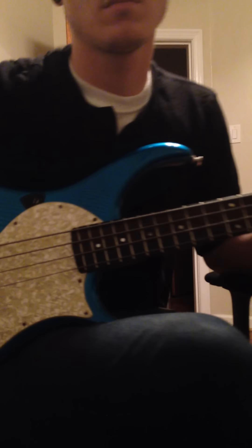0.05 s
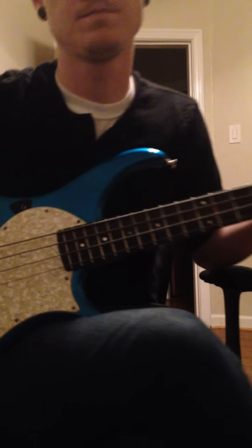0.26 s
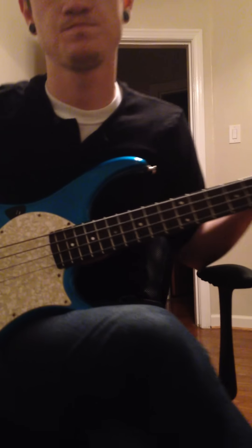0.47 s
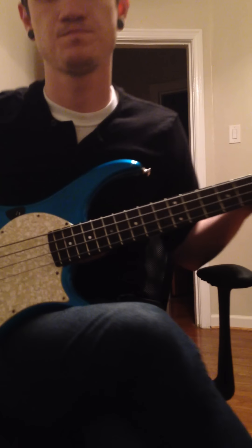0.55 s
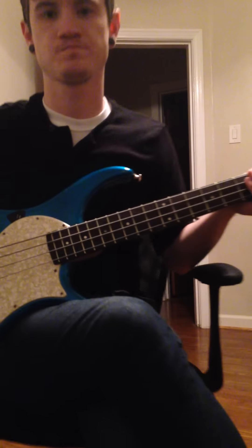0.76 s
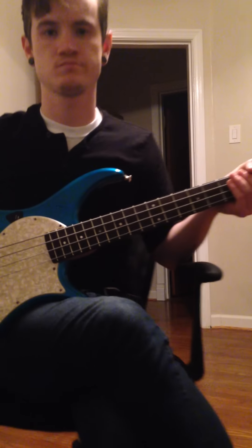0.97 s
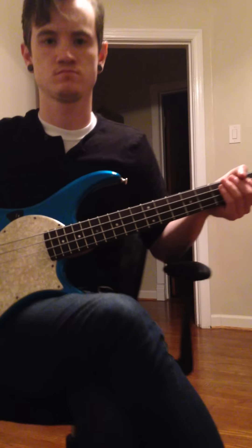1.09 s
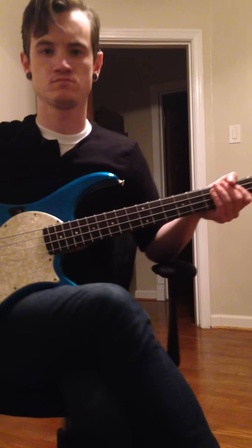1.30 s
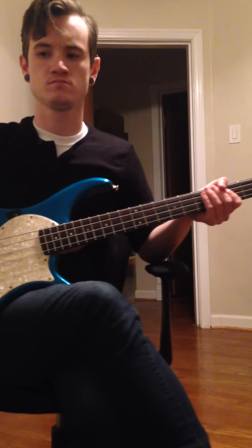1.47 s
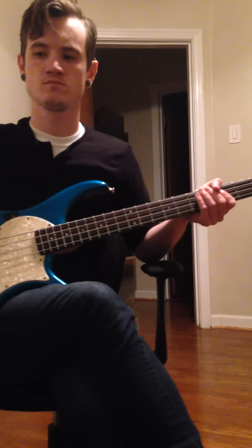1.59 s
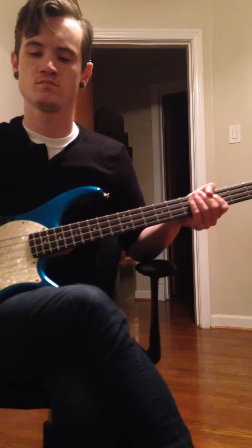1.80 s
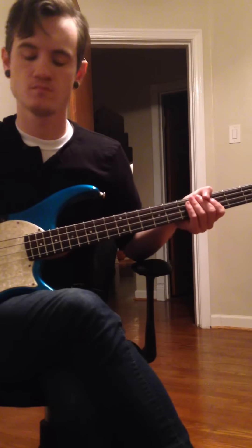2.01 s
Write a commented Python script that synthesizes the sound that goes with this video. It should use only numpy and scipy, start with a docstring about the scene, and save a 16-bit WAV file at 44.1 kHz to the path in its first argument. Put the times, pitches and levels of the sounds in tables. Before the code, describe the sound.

An office chair rolls over a wooden floor, its casters rumbling, clattering and briefly squeaking.

```python
"""Office chair rolling on wood

A chair rolls back over a wooden floor in a small room, speeds up and coasts to rest.
Its wheels drum on the grain and seams of the boards, the floor booms, and the casters
clatter and squeak as they swivel. Tread and cloth scuff; half way, a hand or sleeve
slides with a soft hiss."""
import sys
import numpy as np
from scipy import signal
from scipy.fft import rfft, irfft
from scipy.io import wavfile
from scipy.ndimage import uniform_filter1d

SR = 44100
rng = np.random.default_rng(int(sys.argv[2]) if len(sys.argv) > 2 else 0)


def wrap_up_sound(samples):
    """Save the sound to the file named by the first command line argument, as 16-bit audio."""
    columns = np.atleast_2d(samples).T
    # keep every value between -1 and 1, then stretch to whole-number steps
    tamed = np.clip(columns, -1, 1)
    steps = np.round(tamed * 32767).astype(np.int16)
    wavfile.write(sys.argv[1], SR, steps)


N = 90404
T = np.arange(N) / SR


def from_db(db):
    """Decibels to gain."""
    return 10 ** (np.asarray(db) / 20)


def unit_rms(x):
    """Scale to rms 1."""
    return x / np.sqrt(np.mean(x ** 2) + 1e-20)


def curve(rows):
    """Interpolate (time in seconds, value) rows at every sample."""
    return np.interp(T, *np.transpose(rows))


def lowpass(hz):
    """Second-order low-pass sections."""
    return signal.butter(2, hz, fs=SR, output="sos")


def coloured(x, spectrum):
    """Shape by (frequency in Hz, gain in dB) rows, rolled off under 30 Hz; rms 1."""
    hz = np.arange(1, N // 2 + 2) * SR / N
    points_hz, db = np.transpose(spectrum)
    gain = from_db(np.interp(np.log(hz), np.log(points_hz), db)) / np.sqrt(1 + (30 / hz) ** 8)
    return unit_rms(irfft(rfft(x) * gain, N))


def grains(per_s, spread_db):
    """Random tiny contacts of uneven size; rms 1."""
    sizes = from_db(spread_db * np.minimum(rng.exponential(1, N), 4)) * rng.choice([-1, 1], N)
    return unit_rms(sizes * (rng.random(N) < per_s / SR))


def resonate(x, modes):
    """Parallel resonances sharing the power; a broadband input keeps its level."""
    out = 0
    for k, (hz, db, t60_s) in enumerate(modes):
        r = from_db(-60 / (t60_s * SR))
        ring = signal.lfilter([1, 0, -1], [1, -2 * r * np.cos(2 * np.pi * hz / SR), r * r], x + 1e-18)
        out = out + (-1) ** k * from_db(db) * np.sqrt((1 - r * r) / 2) * ring
    return out / np.sqrt(sum(from_db(db) ** 2 for _, db, _ in modes))


def evened(x, span_s):
    """Hold the running rms at 1."""
    return x / np.sqrt(np.abs(uniform_filter1d(x * x, int(span_s * SR))) + 1e-12)


def rise(start_s, length_s):
    """Linear ramp from 0 to 1."""
    return np.clip((T - start_s) / length_s, 0, 1)


def fall(start_s, decay_s):
    """Hold 1 until the start, then decay exponentially."""
    return np.exp(-np.maximum(T - start_s, 0) / decay_s)


def burst(start_s, db, decay_s):
    """Envelope that starts suddenly and dies away."""
    return from_db(db) * (T >= start_s) * fall(start_s, decay_s)


def room(x, t60_s=0.23, tail_db=-3.5):
    """Direct sound plus a short tail of reflections."""
    t = T[:SR // 2]
    tail = rng.standard_normal(len(t)) * from_db(-60 * t / t60_s) * (t > 0.004)
    return x + from_db(tail_db) * signal.fftconvolve(x, tail / np.linalg.norm(tail))[:N]


def room_air(level_db=-60.5):
    """Still air: faint, steady, low noise."""
    # Each row: frequency in Hz, gain in dB.
    air_spectrum = [(30, -3.5), (70, 6), (150, -7), (400, -15.5), (900, -25), (2500, -28.5), (6000, -33.5),
                    (15000, -40)]
    return from_db(level_db) * coloured(rng.standard_normal(N), air_spectrum)


def wheel_contact(body_db=-3):
    """The grain of the boards shakes wheels and chair base; unit level."""
    # Rumble at full speed. Each row: frequency in Hz, gain in dB.
    wheel_spectrum = [(40, -13), (100, -6.5), (160, -2.5), (220, -0.5), (290, -4), (400, -2.5), (560, -2.5),
                      (850, -10), (1200, -12), (1600, -17), (2150, -19), (2800, -29), (4500, -39),
                      (7000, -52.5), (14000, -62)]
    # Chair base and boards. Each row: frequency in Hz, relative level in dB, T60 in seconds.
    body_modes = [(167.4, -4, 0.28), (266, -4, 0.083), (287.3, 1.5, 0.54), (319.4, 0.5, 0.11),
                  (353.5, -2.5, 0.35), (441, -5.5, 0.15), (503, -1, 0.11), (595, -5, 0.038),
                  (699.4, -5.5, 0.059), (782, -4, 0.078), (1080, -6, 0.27), (1129, -7, 0.027)]
    wheels = coloured(room(grains(per_s=1500, spread_db=3)), wheel_spectrum)
    shaking = coloured(grains(per_s=1500, spread_db=3), [(1500, -9), (3000, -7), (9000, -32)])
    body = from_db(body_db) * unit_rms(resonate(shaking, body_modes))
    return evened(wheels + body, span_s=0.029)


def rolling(gain_db=0.5, full_bright_db=-41.5, splits_hz=(280, 560, 1120)):
    """The wheels' rumble grows louder and brighter with speed."""
    # Each row: time in seconds, relative level in dB.
    rumble_levels = [(0, -65), (.16, -57.5), (.28, -56.5), (.42, -53.5), (.6, -49.5), (.7, -46.5),
                     (.78, -43.5), (.83, -39), (.95, -42), (1.07, -42.5), (1.18, -44.5), (1.32, -48.5),
                     (1.37, -50.5), (1.7, -58), (1.89, -67), (2.05, -72)]
    level_db = curve(rumble_levels)
    tilt_db_per_band = 0.13 * np.minimum(level_db - full_bright_db, 0)
    rest, bands = wheel_contact(), []
    for hz in splits_hz:
        bands.append(signal.sosfiltfilt(lowpass(hz), rest))
        rest = rest - bands[-1]
    rumble = sum(band * from_db(k * tilt_db_per_band) for k, band in enumerate(bands + [rest]))
    return rumble * from_db(level_db + gain_db)


def floor_boom(gain_db=1):
    """The loaded floor rings in its lowest modes."""
    # Each row: time in seconds, relative level in dB.
    boom_levels = [(0.0, -85), (0.04, -59.5), (0.49, -45), (0.51, -51), (0.9, -49), (0.93, -78),
                   (0.96, -48), (1.21, -59), (1.32, -45.5), (1.35, -53), (1.69, -50), (2.05, -67)]
    # Each row: frequency in Hz, relative level in dB, T60 in seconds.
    floor_modes = [(44, -6.5, 0.38), (68.7, -2.5, 1.0), (82, -3, 0.44), (111.7, -8, 0.17),
                   (130, -7.5, 0.23), (177, -12, 0.23)]
    shaking = coloured(rng.standard_normal(N), [(100, -0.5), (300, -19)])
    return from_db(curve(boom_levels) + gain_db) * evened(resonate(shaking, floor_modes), span_s=0.14)


def slides():
    """Skin and cloth slide with a fine friction hiss."""
    # Each row: start and end in seconds, level in dB, attack and release in seconds, slope in dB/s.
    strokes = [(0.068, .115, -71.5, 0.013, 0.038, -15), (1.127, 1.388, -59, 0.13, 0.39, -5.5),
               (1.51, 1.853, -69.5, 0.42, 0.011, 5)]
    # Each row: frequency in Hz, gain in dB.
    hiss_spectrum = [(900, 7), (2300, 8), (3500, 4.5), (6000, 2.5), (10000, 0), (15000, 1)]
    level = 0
    for start_s, end_s, db, attack_s, release_s, db_per_s in strokes:
        shape = np.sqrt(rise(start_s, attack_s)) * fall(end_s, release_s)
        level = level + from_db(db + db_per_s * (T - start_s)) * shape
    return level * coloured(grains(per_s=16000, spread_db=1), hiss_spectrum)


def ticks(decay_s=0.0019):
    """Small, bright ticks of clothing."""
    # Each row: start in seconds, level in dB.
    onsets = [(0.0692, -64), (0.3752, -60), (1.0954, -51.5)]
    # Each row: frequency in Hz, gain in dB.
    tick_spectrum = [(1000, -5), (4000, 6), (7500, 1), (11000, -5), (15000, -2)]
    level = sum(burst(start_s, db, decay_s) for start_s, db in onsets)
    return room(level * coloured(rng.standard_normal(N), tick_spectrum))


def scuffs():
    """Tread and cloth give short grainy rubs."""
    # Each row: start in seconds, level in dB, attack and decay in seconds.
    rubs = [(.07, -67, 0.0096, 0.065), (.158, -69, .012, .012), (0.396, -59, 0.003, 0.064),
            (.52, -59, 0.017, 0.062), (1.104, -54.5, 0.0053, 0.06), (1.73, -67.5, 0.11, 0.083),
            (1.949, -69.5, 0.0042, 0.013)]
    # Each row: frequency in Hz, gain in dB.
    scuff_spectrum = [(500, 9), (1500, 6.5), (2700, 6), (4200, -4.5), (7000, -11.5), (14000, -21)]
    level = sum(from_db(db) * rise(start_s, attack_s) * fall(start_s + attack_s, decay_s)
                for start_s, db, attack_s, decay_s in rubs)
    return room(level * coloured(grains(per_s=5000, spread_db=0.5), scuff_spectrum))


def seam_bumps(attack_s=0.0021, decay_s=0.016, ring_db=0.5, thud_db=-6.5, thud_top_hz=650):
    """Wheels drop into seams: each gives a dull thud and rings one board briefly."""
    # Each row: start in seconds, relative level in dB, pitch in Hz.
    seams = [(.225, -52.5, 158), (.275, -51.5, 344), (.315, -53.5, 370), (0.788, -37.5, 277),
             (0.8223, -40, 602), (0.856, -37, 500), (.949, -36, 491), (.956, -37, 183.5),
             (.987, -38.5, 705), (1.0345, -51.5, 430), (1.088, -41.5, 502), (1.103, -43.5, 712),
             (1.256, -48, 474)]
    ring, push = 0, 0
    for start_s, db, hz in seams:
        level = burst(start_s, db, decay_s) * rise(start_s, attack_s)
        ring = ring + level * np.sqrt(2) * np.sin(2 * np.pi * hz * (T - start_s))
        push = push + level
    thuds = signal.sosfilt(lowpass(thud_top_hz), wheel_contact() * push)
    return from_db(ring_db) * room(ring) + from_db(thud_db) * thuds


def caster_clatter(knock_db=3, knock_decay_s=0.0019, top_hz=5470):
    """Loose casters swivel with a knock, then chatter in dying runs of clicks."""
    # Each row: start in seconds, level in dB, decay in seconds.
    swivels = [(0.3563, -57, 0.051), (0.5137, -45.5, 0.032), (0.55, -51, 0.032), (0.5846, -53, 0.088),
               (0.6877, -46.5, 0.0067), (0.7811, -48.5, 0.057), (0.822, -55.5, 0.15)]
    # Each row: frequency in Hz, relative level in dB, T60 in seconds.
    caster_modes = [(1134, 4, 0.017), (1417, 1.5, 0.038), (1520, 0.5, 0.012), (1803, 2, 0.014),
                    (2005, 0, 0.0098), (2245, -5, 0.017), (2353, -5.5, 0.025), (3640, -14, 0.0066)]
    clicks = evened(grains(per_s=1100, spread_db=2.5), span_s=0.01)
    chatter = clicks * sum(burst(*row) for row in swivels)
    knock_level = sum(burst(start_s, db + knock_db, knock_decay_s) for start_s, db, _ in swivels)
    ring = resonate(chatter + knock_level * rng.standard_normal(N), caster_modes)
    return room(signal.sosfilt(lowpass(top_hz), ring))


def caster_squeaks(waver_share=0.066, waver_s=0.001464):
    """Turning casters stick and slip in rough, gliding squeaks and groans."""
    # Each row: start and length in seconds, start and end pitch in Hz, level in dB.
    glides = [(0.517, 0.027, 1880, 2180, -53.5), (0.557, 0.018, 2230, 2047, -51.5),
              (0.582, 0.0159, 1350, 2095, -49.5), (0.643, 0.0248, 2280, 1830, -56.5),
              (0.694, 0.0286, 2120, 1766, -56), (0.707, 0.033, 630, 558, -40.5),
              (0.783, 0.023, 570, 523, -37), (0.82, 0.011, 1950, 1710, -48),
              (0.899, 0.021, 1500, 2314, -50)]
    out = 0
    for start_s, length_s, start_hz, end_hz, db in glides:
        progress = rise(start_s, length_s)
        waver = unit_rms(uniform_filter1d(rng.standard_normal(N), int(waver_s * SR)))
        hz = (start_hz + (end_hz - start_hz) * progress) * (1 + waver_share * waver)
        arch = 2 * np.sqrt(2 * progress * (1 - progress))
        out = out + from_db(db) * arch * np.sin(2 * np.pi * np.cumsum(hz) / SR)
    return room(out)


def scene():
    """Room air, chair, floor and sitter in mono."""
    mix = room_air() + rolling() + floor_boom() + slides() + ticks() + scuffs()
    return (mix + seam_bumps() + caster_clatter() + caster_squeaks())[None]


def record(dry):
    """The microphone loses the deepest bass; the top is cut steeply."""
    low_cut_hz, high_cut_hz = 44, 15300
    dry = signal.sosfilt(signal.butter(4, low_cut_hz, "high", fs=SR, output="sos"), dry)
    return signal.sosfilt(signal.ellip(12, 0.1, 70, high_cut_hz, fs=SR, output="sos"), dry)


dry = scene()
out = record(dry)
wrap_up_sound(out)
```